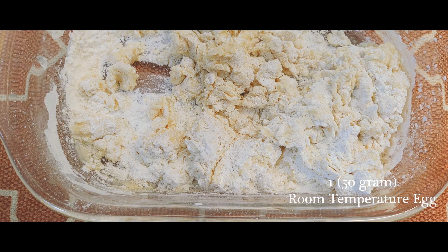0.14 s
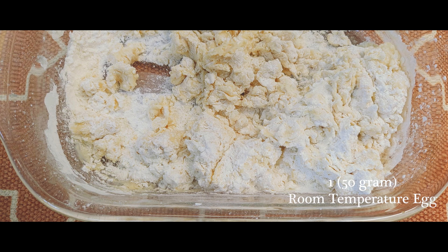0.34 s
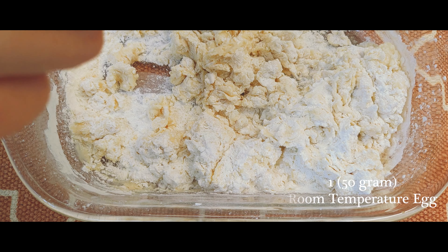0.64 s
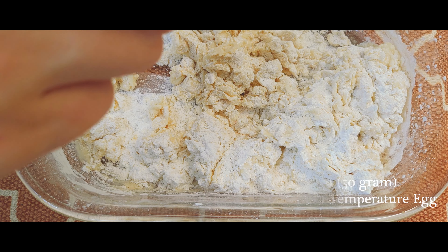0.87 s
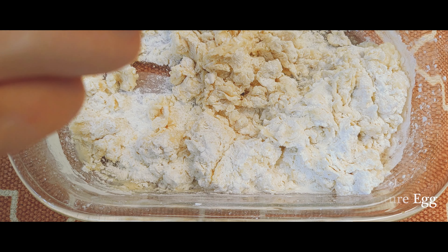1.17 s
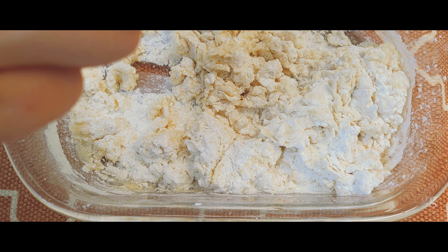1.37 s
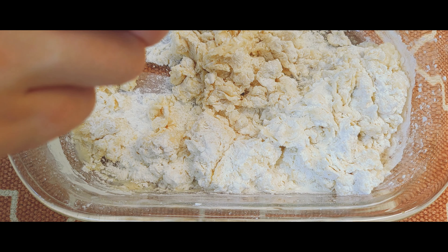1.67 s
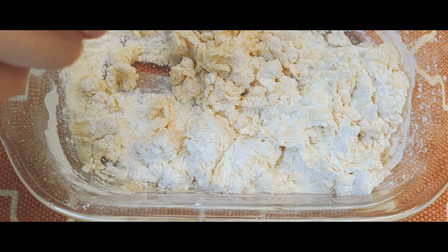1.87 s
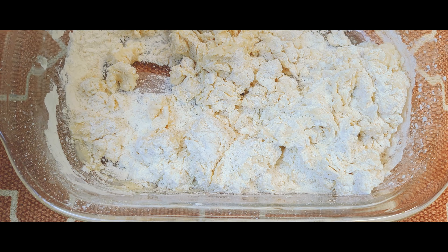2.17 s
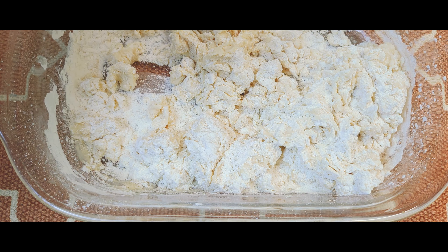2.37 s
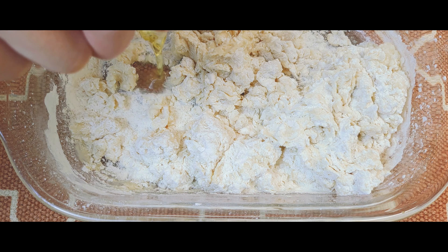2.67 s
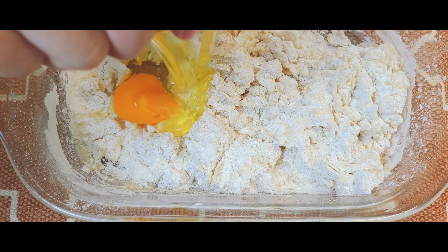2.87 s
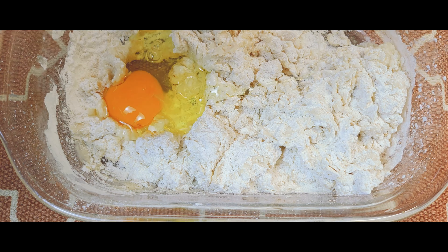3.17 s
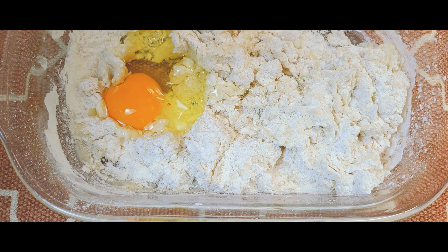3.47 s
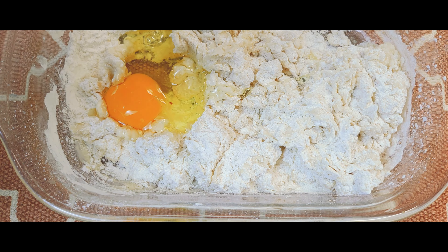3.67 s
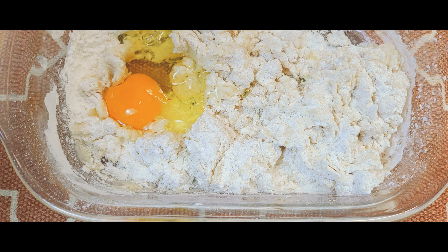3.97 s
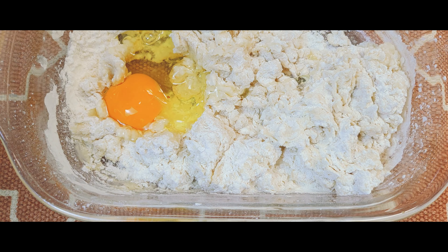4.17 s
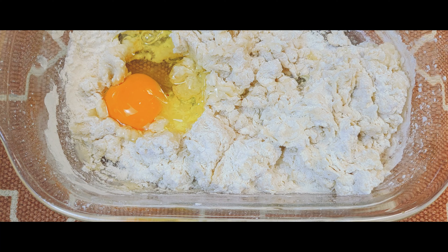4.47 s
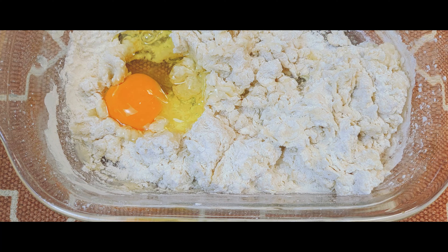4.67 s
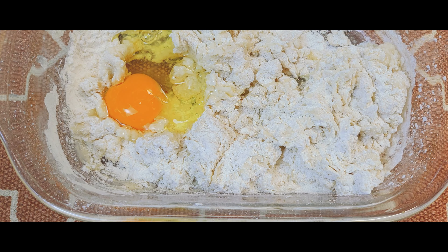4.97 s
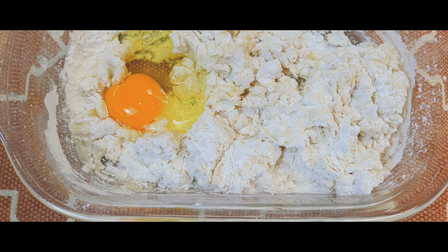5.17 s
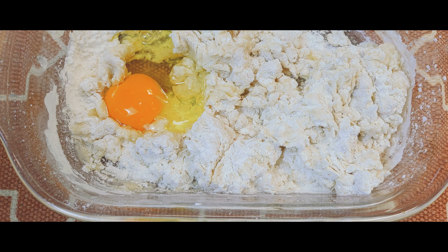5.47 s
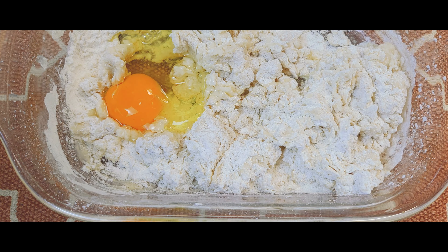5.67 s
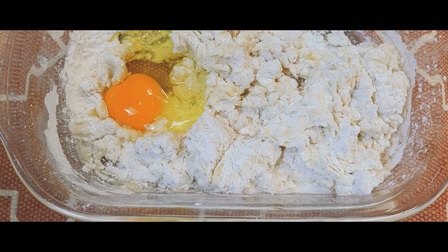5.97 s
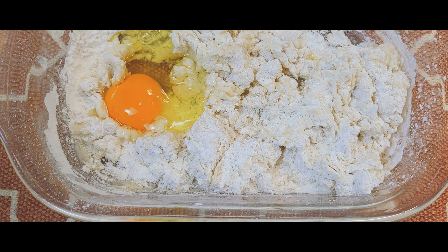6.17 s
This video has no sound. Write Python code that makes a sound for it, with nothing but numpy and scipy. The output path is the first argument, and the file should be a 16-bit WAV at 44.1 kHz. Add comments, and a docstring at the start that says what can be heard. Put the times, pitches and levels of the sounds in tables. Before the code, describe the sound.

A small, quiet kitchen with soft low rumble, faint motor hum and very little air; the hum rises slightly around 3-4 s. The egg is close to the microphone. Barely audible ticks come from 0.5 s, then a clear dry shell tap at 1.1 s, with tiny ticks and a soft swish until 2 s. A faint low throb and bright tick at about 2.4 s lead into the loudest event: sharp, splintery cracks at 2.55-2.7 s, more cracking and a short wet plop near 2.9 s, with small crackles to 3.1 s. Gentle hand rustles follow at 3.5-4 s, with a thin tick at 3.7 s. Empty shells crunch briefly at 4.4 s. Slightly farther away, hard clacks with a glassy ping land in a bowl at 5.1 s, then a heavier cluster at 5.4 s. At 5.66 s the bowl drops onto its foot with a soft bump and dull fluttering rumble, fading to the end.

```python
"""In a small, quiet kitchen a low hum, rumble and faint air lie beneath everything: filtered noise and tones.
An egg is cracked by hand over a dish: the shell ticks, with faint grating and soft swishes (shaped noise).
After a faint throb of the gripping hands the shell bursts, and the egg plops out (sines rising in pitch).
The empty halves crunch together; then they are put down with a few knocks in a bowl to one side
(contact noise and ringing modes), and the bowl drops onto its foot and flutters as it dies away."""
import sys
import numpy as np
from scipy import signal
from scipy.fft import rfft, irfft
from scipy.io import wavfile

SR = 44100
rng = np.random.default_rng(int(sys.argv[2]) if len(sys.argv) > 2 else 0)


def unload_wav(signal):
    """Save mono or channel-first audio to the path in sys.argv[1] as 16-bit WAV at rate SR, clipped to [-1, 1]."""
    wavfile.write(
        sys.argv[1],
        SR,
        np.round(np.clip(np.atleast_2d(signal).T, -1, 1) * 32767).astype(np.int16),
    )


N = 279153
TIME = np.arange(N) / SR  # seconds

# Spectral shape of the background noise. Each row: frequency in Hz, relative density in dB per Hz.
BACKGROUND_SPECTRUM = [(12, -53.5), (24, -22.5), (40, -5), (50, -10), (92, -0.5), (132, -8.5), (160, -14),
                       (217, -18.5), (319, -17.5), (432, -22.5), (870, -28), (1910, -39), (4000, -45.5),
                       (8000, -52), (16000, -67)]
# Course of the background before its trims. Each row: time in seconds, rumble level in dB, air level in dB.
BACKGROUND_COURSE = [(0.0, -62.5, -73.5), (4.84, -63, -71.5), (5.7, -58.5, -70), (6.3, -57, -73)]
# Wavering mains and motor hum. Each row: centre frequency in Hz, level in dB.
HUM_TONES = [(62, -69), (98, -66.5), (116, -72.5), (158, -71)]
# Steady motor tones. Each row: frequency in Hz, level in dB before the slow rise and the waver.
MOTOR_TONES = [(195, -74.0), (232, -78.5), (278, -84.5), (386, -81), (430, -82.5)]
# Slow rise of the motor tones. Each row: time in seconds, gain in dB.
MOTOR_RISE = [(0, -12.0), (2.8, -5), (4.0, 4.5), (6.3, 4.5)]

# Shell resonances: thump, hollow of the cup, flex of the wall, broken edge, fine splinters.
# Each row: lower edge in Hz, upper edge in Hz.
SHELL_BANDS = [(620, 1030), (1500, 2720), (3150, 5150), (6400, 10400), (11000, 14000)]
# How readily each shell resonance speaks. Each entry: relative level in dB.
SHELL_RESPONSE_DB = [0, -1, -4.5, -2.5, -9]
# A piece of shell radiates little below its own pitch; a dry break is brighter than a wet one.
BELOW_PITCH_DB_PER_OCTAVE, TILT_PIVOT_HZ = 26, 4230
# Fine splinters fly mostly while the egg is broken open; at other times their level changes by this much.
BREAK_S, FEW_SPLINTERS_DB = (2.5, 3.2), -10.5
# Snaps of the shell. Each row: start in seconds, crumbling time constant in ms, base level in dB,
# pitch of the piece in Hz, spectral tilt in dB per octave.
SHELL_SNAPS = [ (0.469, 0.62, -57, 4400, -1), (0.808, 0.92, -53, 4400, -8), (1.1019, 6.1, -38, 1200, -1),
               (1.1162, 1.4, -11, 820, 3.5), (1.471, 1.6, -55, 1400, -2.5), (1.5608, 0.91, -50, 4040, 1),
               (1.581, 2.2, -42, 5400, -3), (1.722, 1.1, -51, 4400, -2), (2.3958, 1.3, -16, 8800, -2),
               (2.5768, 2.2, 9, 2860, -6.5), (2.6090, 1.4, -3.5, 1594, -1), (2.629, 0.9, -2.5, 880, 3.5),
               (2.712, 2, -11.5, 4630, -6), (2.8690, 1.8, -29, 1650, -2.5), (2.901, 2.0, -11, 1500, -3.7),
               (2.9880, 1.0, -23.5, 6000, 1.5), (3.0245, 3.9, -24, 1900, -2),
               (3.0526, 1.4, -28.5, 1620, -1), (3.11, 2.6, -40, 1500, 8), (3.7313, 1.5, -26, 10000, 0),
               (5.3971, 4.3, -22.5, 1446, -4.5), ]
# Every crack runs on a moment later, weaker and slower (slowness as a ratio).
RUN_ON_S, RUN_ON_DB, RUN_ON_SLOWER = 0.005, -15.5, 3.0
# Strokes of noise: shell edges grating; soft swishes at 1.953, 3.492 and 3.612 s, probably hands rustling;
# at 2.396 s the short noisy tail of a tick, probably the room. Each row: start in seconds,
# length in seconds, base level in dB, pitch in Hz, spectral tilt in dB per octave.
NOISE_STROKES = [ (1.327, .069, -59, 1490, 5.5), (1.953, 0.2, -49, 1370, 0.5),
                 (2.396, .05, -32.5, 7160, 0.5), (2.551, .03, -21, 1060, 1), (2.644, .048, -38, 1030, -4),
                 (2.744, 0.13, -27.5, 2860, -11.5), (2.86, 0.084, -30, 1180, -3),
                 (2.942, .075, -24.5, 1200, 1.5), (3.057, 0.026, -21.5, 1650, 3.5),
                 (3.492, 0.22, -48.5, 1606, -2.5), (3.612, 0.23, -46.5, 1576, 6.5),
                 (3.990, 0.2, -51, 1713, -1), (4.234, 0.066, -46, 1590, -3.5),
                 (4.356, 0.061, -46, 1700, -6), (4.401, 0.049, -17.5, 2034, -3.5),
                 (4.425, 0.043, -22.5, 2010, 0.5), ]

# Wet plops of egg in the shell. Each row: start in seconds, level in dB before swell and decay,
# final frequency in Hz, time to decay by 60 dB in seconds.
EGG_PLOPS = [ (2.721, -50.5, 1300, 0.073), (2.771, -46.5, 1380, 0.05), (2.9031, -5, 1674, 0.0092),
             (2.9155, -24, 1710, 0.017), (4.368, -56.5, 1800, .06), (4.556, -59.5, 1565, 0.049), ]
# Every plop and scattered ring starts at a share of its final pitch.
PLOP_SWELL_S, PLOP_GLIDE_S, PLOP_START_SHARE = 0.00096, 0.0015, 0.84
# Narrow rings: the plop's dying ring near 1.7 kHz, a faint squeak, a short ring. Each row: start in seconds,
# length in seconds, level in dB at the start, middle frequency in Hz.
NARROW_RINGS = [(2.93, .34, -52.5, 1682), (4.087, 0.035, -68, 2633), (4.399, .11, -42, 1846)]
# Each is made of scattered sines, spread this far to either side and fading this much over its length.
SINES_PER_S, SINE_T60_S, SINE_SPREAD_OCTAVES, RING_FADE_DB = 140, 0.05, 0.174, 22.5

# Knocks in the bowl. Each row: start in seconds, contact time constant in ms, base level in dB of the thud
# into the table, base level in dB of the clack of the wall, level in dB of the ping.
BOWL_KNOCKS = [ (5.1178, 1.97, -24, -3.5, -18), (5.1272, 13, -22, -9.5, -13),
               (5.3954, 3.0, -23, -17.5, -49.5), (5.4070, 9.7, -7, -11.5, -37),
               (5.4163, 2.5, -13, 1.5, -23.5), (5.4270, 20, -15, -6.5, -28), (5.477, 7.3, -8.5, -22, -39),
               (5.7560, 2, -41, -50, -75), ]
# Knock resonances: table top, foot of the bowl, its belly, its rim, contact tick.
# Each row: lower edge in Hz, upper edge in Hz.
KNOCK_BANDS = [(480, 620), (680, 940), (1400, 2140), (2350, 3730), (4000, 7900)]
# Thud shared by table top and foot, clack by belly, rim and tick; the ringing follows the clack (relative dB).
THUD_DB, CLACK_DB, RING_DB = [-8, -1], [0.5, -4.5, -22], -33.5
# The heavy worktop gives a little under each thud; hard contact adds a thin glassy click at the very top.
WORKTOP_BAND_HZ, WORKTOP_DB = (280, 380), -17.5
CLICK_BAND_HZ, CLICK_DB = (9000, 14000), -36.0
# A tight cluster of high modes gives the bowl its glassy ping.
PING_BAND_HZ, PING_T60_S = (7000, 7480), 0.096
# Modes of the bowl. Each row: frequency in Hz, relative level in dB, time to decay by 60 dB in seconds.
BOWL_MODES = [(558, -17.5, 0.078), (774, -8, 0.15), (1440, -26, 0.101), (1720, -8.5, 0.052),
              (2228, -5, 0.061), (2875, -5, 0.12), (3070, -8, 0.19), (3360, -8.5, .08)]

# Colour of the kitchen's echo. Each row: frequency in Hz, level in dB.
ECHO_SPECTRUM = [(300, 4.5), (800, 3.5), (2000, -1), (4500, 1.5), (8000, -4), (15000, -7)]
# Decay of the kitchen's echo. Each row: frequency in Hz, time to decay by 60 dB in seconds before scaling.
ECHO_DECAY = [(300, 0.13), (800, 0.1), (1800, 0.5), (3500, 0.4), (7000, 0.41), (10000, 0.33),
              (15000, 0.091)]
# Near surfaces. Each row: delay in seconds, level in dB.
NEAR_REFLECTIONS = [(.0021, -25), (.0064, -19), (0.0115, -20)]
CUTOFF_HZ = 16400


def from_db(db):
    """A level in decibels is twenty times the logarithm of the amplitude; this inverts it."""
    return 10 ** (np.asarray(db) / 20)


def unit_energy(x):
    """Energy is the summed square of a signal; it is scaled to one."""
    return x / np.sqrt(np.sum(x ** 2) + 1e-20)


def unit_rms(x):
    """Power is the mean square of a signal; it is scaled to one."""
    return unit_energy(x) * np.sqrt(len(x))


def decay_60(t, t60):
    """Exponential decay: the amplitude falls by 60 dB, a factor of 1000, in t60 seconds."""
    return np.exp(-np.log(1000) * t / t60)


def at_hz(points, hz):
    """Logarithmic frequency scale: table values are interpolated along it."""
    table_hz, value = np.transpose(points)
    return np.interp(np.log(hz), np.log(table_hz), value)


def band(x, low_hz, high_hz, order=3):
    """Broad resonance: a causal band-pass filter responds only after its excitation."""
    edges = [low_hz, min(high_hz, SR / 2 - 1000)]
    sections = signal.butter(order, edges, "band", fs=SR, output="sos")
    return signal.sosfilt(sections, x + 1e-18)


def add(out, s, sound):
    """Superposition: a sound is added to the mix at its own time."""
    start = round(s * SR)
    out[start:start + len(sound)] += sound[:N - start]


def background(low_db=-1.5, air_db=-0.5, waver_hz=8.0):
    """Filtered noise: a shaped spectrum gives rumble and air, and narrow bands give wavering hum tones."""
    s, *levels = np.transpose(BACKGROUND_COURSE)
    rumble_level, air_level = [from_db(np.interp(TIME, s, db)) for db in levels]
    hz = np.fft.rfftfreq(N, 1 / SR) + 1  # offset keeps the logarithm finite
    spectrum = rfft(rng.standard_normal(N)) * from_db(at_hz(BACKGROUND_SPECTRUM, hz))
    rumble = unit_rms(irfft(spectrum * (hz < 200), N))
    air = irfft(spectrum * (hz >= 200), N)
    air = air / np.std(band(air, 200, 900))  # the air level refers to this band
    hum = np.zeros(N)
    for centre_hz, db in HUM_TONES:
        tone = band(rng.standard_normal(N), centre_hz - waver_hz, centre_hz + waver_hz)
        hum += from_db(db) * unit_rms(tone)
    return from_db(low_db) * rumble_level * rumble + from_db(air_db) * air_level * air + hum


def whine(waver_db=1.0):
    """Amplitude modulation: faint motor tones waver slowly, rising most between 2.8 and 4 seconds."""
    rise = from_db(np.interp(TIME, *np.transpose(MOTOR_RISE)))
    tones = np.zeros(N)
    for hz, db in MOTOR_TONES:
        waver = waver_db * np.sin(2 * np.pi * rng.uniform(0.3, 1.1) * TIME)
        tones += from_db(db + waver) * np.sin(2 * np.pi * hz * TIME)
    return rise * tones


def grit(count, spread_db):
    """Random impulses: a dense run of uneven size acts as rough noise."""
    size_db = spread_db * np.clip(rng.standard_normal(count), -2, 2)
    return rng.standard_normal(count) * from_db(size_db)


def excite(force, bands, levels_db):
    """Forced response: one force drives each broad resonance with an energy of its own."""
    return sum(from_db(db) * unit_energy(band(force, *edges)) for edges, db in zip(bands, levels_db))


def shell_levels(s, db, pitch_hz, tilt_db):
    """Radiation of a small piece: its output falls off below its pitch and tilts with its brightness."""
    hz = np.sqrt(np.prod(SHELL_BANDS, axis=1))  # band centres
    octaves_below = np.maximum(0, np.log2(pitch_hz / hz))
    levels = db + np.array(SHELL_RESPONSE_DB) + tilt_db * np.log2(hz / TILT_PIVOT_HZ)
    levels -= BELOW_PITCH_DB_PER_OCTAVE * octaves_below
    if not BREAK_S[0] < s < BREAK_S[1]:
        levels[-1] += FEW_SPLINTERS_DB
    return levels


def snaps():
    """Sudden release of strain: a crack starts at once, crumbles within milliseconds and runs on once more."""
    out, t = np.zeros(N), TIME[:SR // 20]
    for s, crumble_ms, *piece in SHELL_SNAPS:
        crumble_s = crumble_ms / 1000
        run_on_decay = np.exp(-np.abs(t - RUN_ON_S) / (RUN_ON_SLOWER * crumble_s))
        run_on = from_db(RUN_ON_DB) * (t > RUN_ON_S) * run_on_decay
        force = grit(len(t), spread_db=2.0) * (np.exp(-t / crumble_s) + run_on)
        add(out, s, excite(force, SHELL_BANDS, shell_levels(s, *piece)))
    return out


def noise_strokes():
    """Friction noise: rough noise under a stroke that swells and fades gives grating and soft swishes."""
    out, t = np.zeros(N), TIME[:SR // 3]
    for s, length, *piece in NOISE_STROKES:
        stroke = np.sin(np.pi * np.minimum(t / length, 1))
        force = grit(len(t), spread_db=5.5) * stroke
        add(out, s, excite(force, SHELL_BANDS, shell_levels(s, *piece)))
    return out


def soft_thud(start_s=2.345, length_s=0.14, db=-51.0, hz=102.8):
    """Narrow-band noise: a faint low throb swells and fades as the hands grip the egg."""
    out, t = np.zeros(N), TIME[:SR // 4]
    swell = np.sin(np.pi * np.minimum(t / length_s, 1))
    throb = unit_rms(band(rng.standard_normal(N), hz * 0.88, hz * 1.13))
    add(out, start_s, from_db(db) * swell * throb[-len(t):])  # the settled end of the noise
    return out


def scattered_rings():
    """Superposed decaying sines: random times and nearby pitches make a narrow ring, in rows like the plops."""
    rows = []
    for s, length, db, hz in NARROW_RINGS:
        for when, place in rng.random((round(SINES_PER_S * length), 2)):
            octaves = SINE_SPREAD_OCTAVES * (2 * place - 1)
            rows.append((s + when * length, db - RING_FADE_DB * when, hz * 2 ** octaves, SINE_T60_S))
    return rows


def plops_and_rings():
    """Cavity resonance: an opening air pocket, like each scattered ring, is a decaying sine rising in pitch."""
    out, t = np.zeros(N), TIME[:SR // 10]
    for s, db, final_hz, t60 in EGG_PLOPS + scattered_rings():
        hz = final_hz * (1 - (1 - PLOP_START_SHARE) * np.exp(-t / PLOP_GLIDE_S))
        swell = 1 - np.exp(-(t / PLOP_SWELL_S) ** 2)
        ring = np.sin(2 * np.pi * np.cumsum(hz) / SR)
        add(out, s, from_db(db) * swell * decay_60(t, t60) * ring)
    return out


def knocks():
    """Impact and modal ringing: each contact clacks, shakes the table top and sets the bowl's modes going."""
    out, t = np.zeros(N), TIME[:SR // 4]
    bands = [WORKTOP_BAND_HZ, *KNOCK_BANDS, CLICK_BAND_HZ]
    for s, contact_ms, thud_db, clack_db, ping_db in BOWL_KNOCKS:
        thud_levels = [thud_db + db for db in (WORKTOP_DB, *THUD_DB)]
        clack_levels = [clack_db + db for db in (*CLACK_DB, CLICK_DB)]
        contact = np.exp(-t * 1000 / contact_ms)
        for edges, db in zip(bands, thud_levels + clack_levels):
            noise = rng.standard_normal(len(t)) * contact
            add(out, s, from_db(db) * unit_energy(band(noise, *edges)))
        cluster = rng.standard_normal(len(t)) * decay_60(t, PING_T60_S)
        add(out, s, from_db(ping_db) * unit_energy(band(cluster, *PING_BAND_HZ)))
        for hz, db, t60 in BOWL_MODES:
            mode_db = clack_db + RING_DB + db + rng.normal(0, 0.67)
            strength = from_db(mode_db) * rng.choice([-1, 1])
            add(out, s, strength * decay_60(t, t60) * np.sin(2 * np.pi * hz * t))
    return out


def rocking(start_s=5.66, bump_db=-26.5, roll_db=-25.0, t60=0.78, sway_hz=52.38, sway_db=10.0):
    """Modulated rolling noise: the bowl drops onto its foot with a soft bump and a dull, fluttering rumble."""
    out, t = np.zeros(N), TIME[:SR * 2 // 3]
    bump = rng.standard_normal(len(t)) * np.exp(-t / 0.00073)
    sway = from_db(sway_db * np.cos(2 * np.pi * sway_hz * t))
    roll = rng.standard_normal(len(t)) * sway * decay_60(t, t60)
    for force, db in (bump, bump_db), (roll, roll_db):
        add(out, start_s, from_db(db) * unit_energy(band(force, 540, 914)))
    return out


def reflections(x):
    """Early reflection: the worktop, the dish and the wall return delayed, weaker copies."""
    out = x.copy()
    for delay, db in NEAR_REFLECTIONS:
        add(out, delay, from_db(db) * x)
    return out


def kitchen(x, length, build_s=0.0013):
    """Diffuse reverberation: noise builds up and decays at its own pace in each half octave."""
    t, response = TIME[:SR * 3 // 4], 0
    edges = np.geomspace(200, 18000, 14)
    for low, high in zip(edges, edges[1:]):
        hz = np.sqrt(low * high)
        build_up = 1 - np.exp(-(t / build_s) ** 2)
        envelope = build_up * decay_60(t, length * at_hz(ECHO_DECAY, hz))
        tail = unit_energy(band(rng.standard_normal(len(t)), low, high) * envelope)
        bandwidth_gain = np.sqrt(2 * (high - low) / SR)
        response = response + tail * from_db(at_hz(ECHO_SPECTRUM, hz)) * bandwidth_gain
    return signal.fftconvolve(x, response)[:N]


def scene(cupped_echo_db=-10.5, open_echo_db=-9.0, bowl_echo_db=-10.0):
    """Direct and diffuse sound: the egg is close, at first cupped for a shorter echo; the bowl is farther off."""
    egg = snaps() + noise_strokes() + plops_and_rings()
    bowl = knocks() + rocking()
    cupped = TIME < 2.5  # held in the hands
    echo = from_db(cupped_echo_db) * kitchen(egg * cupped, length=0.62)
    echo += from_db(open_echo_db) * kitchen(egg * ~cupped, length=0.74)
    echo += from_db(bowl_echo_db) * kitchen(bowl, length=1.15)
    mix = reflections(egg + bowl) + echo + soft_thud() + whine() + background()
    return mix[None]  # one channel


def record(dry, ceiling=1.0):
    """Soft saturation and band limiting: strong peaks are rounded off, and the top is cut steeply."""
    rounded = ceiling * np.tanh(dry / ceiling)
    low_pass = signal.ellip(10, 0.1, 80, CUTOFF_HZ, fs=SR, output="sos")
    return signal.sosfilt(low_pass, rounded)


dry = scene()
out = record(dry)
unload_wav(out)
```